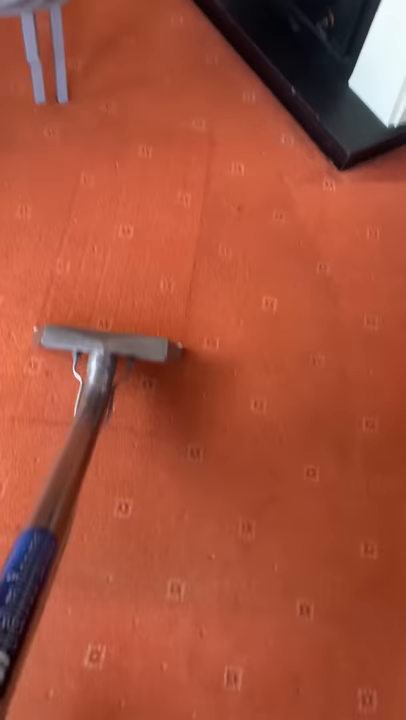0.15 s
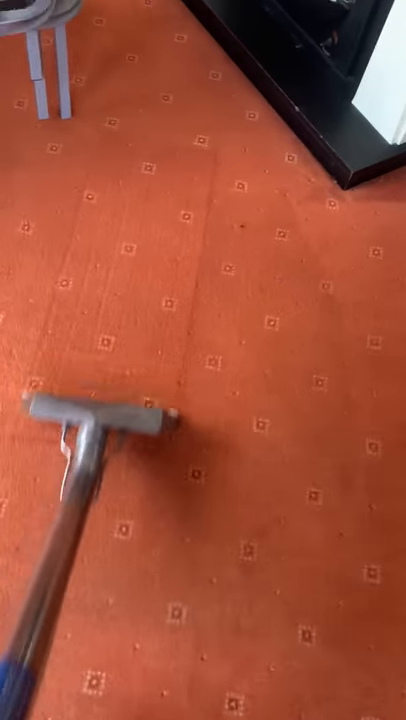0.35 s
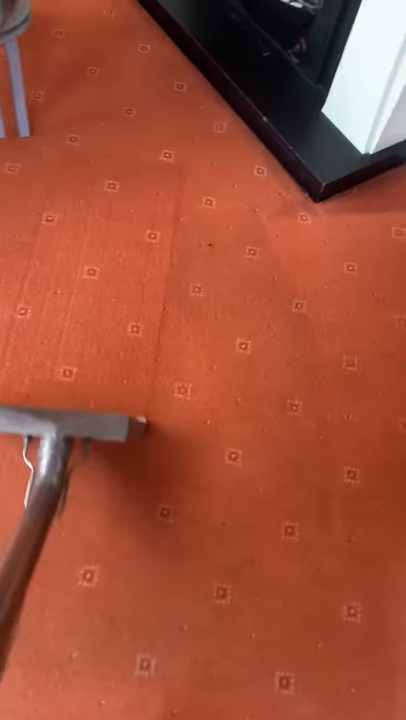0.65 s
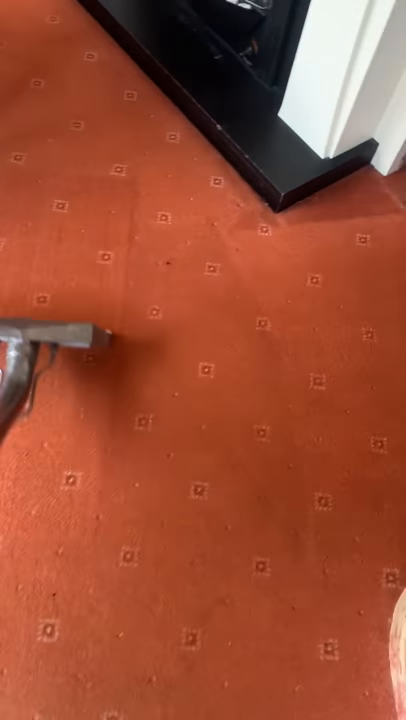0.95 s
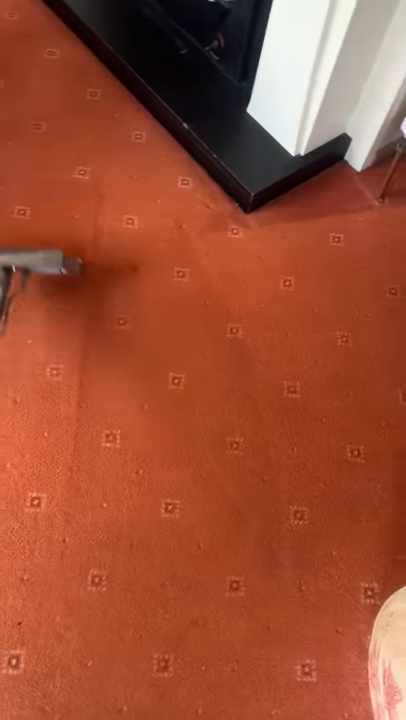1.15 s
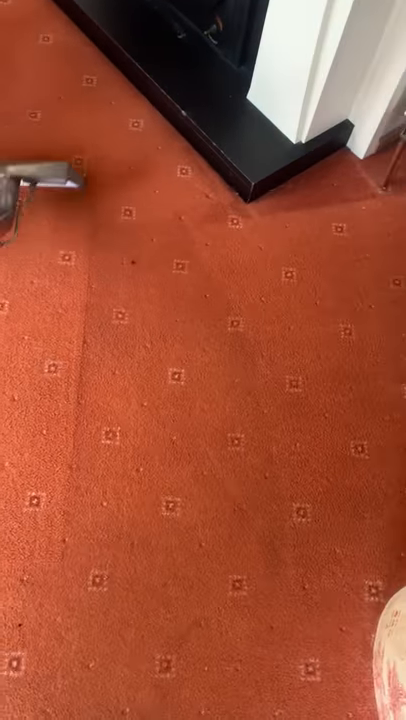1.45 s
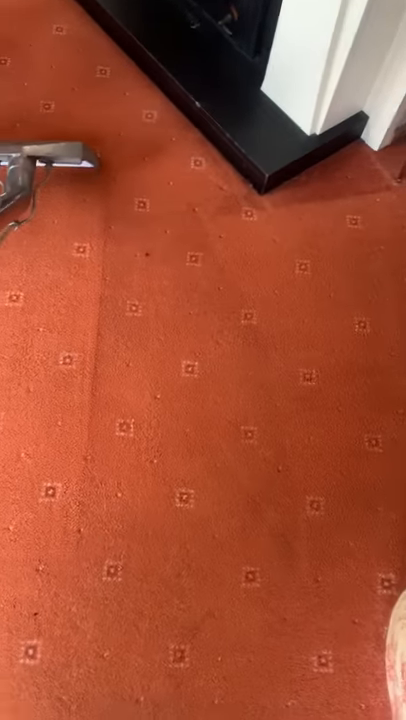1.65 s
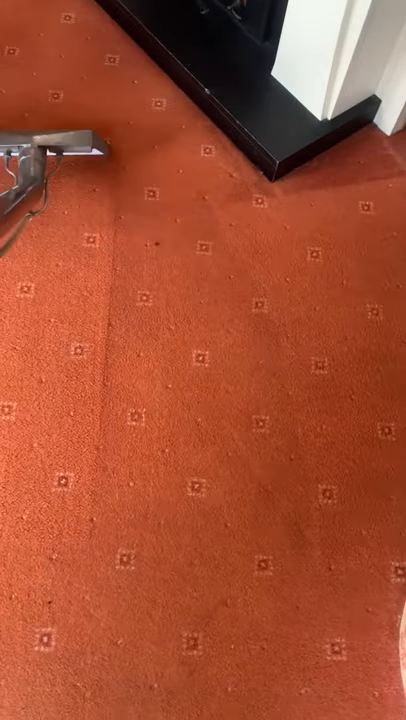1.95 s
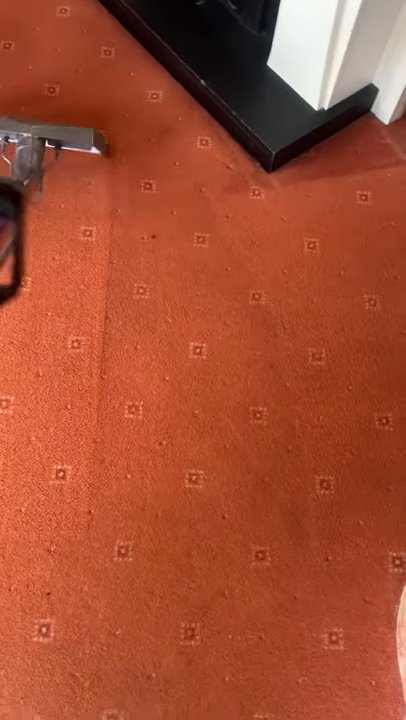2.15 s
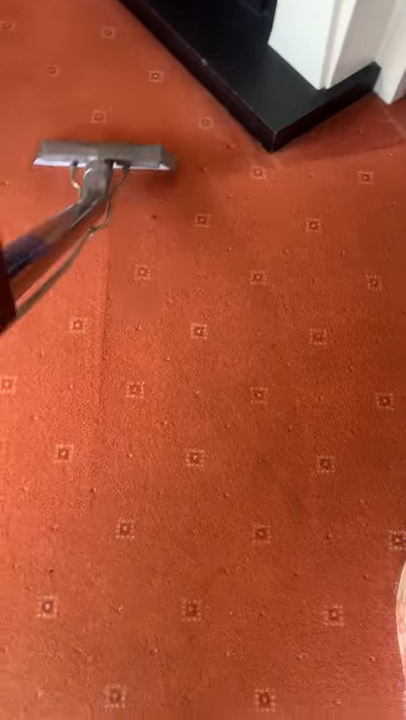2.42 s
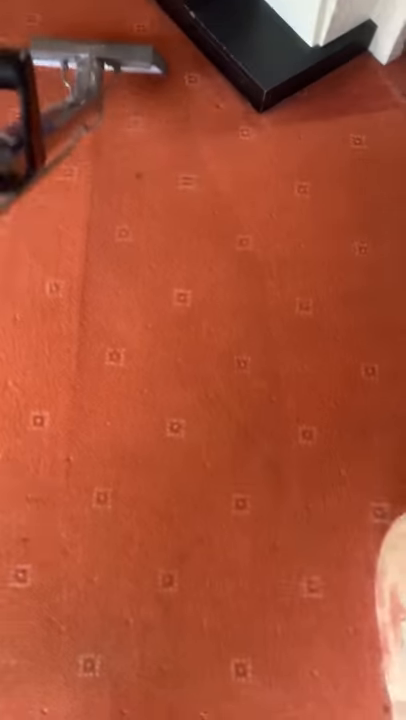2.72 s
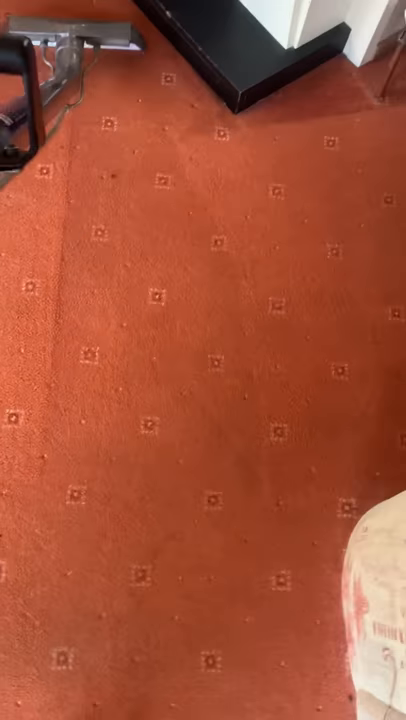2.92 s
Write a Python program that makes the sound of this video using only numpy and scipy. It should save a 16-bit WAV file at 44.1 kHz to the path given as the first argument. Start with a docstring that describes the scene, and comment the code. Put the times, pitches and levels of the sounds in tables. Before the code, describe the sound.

Wet vacuum suction of a carpet-cleaning wand over low machine hum, broken by one spluttering gulp

```python
"""Carpet-cleaning wand gulping air.

A wand is worked over a carpet in a living room. Shaped noise and drop impacts make the rush of air
and water into its slot, over a hum of sine tones and a lumpy rumble of low noise. Once the wand tilts
and its seal breaks: a short spluttering noise roar rings in the tube's resonances, and slugs of water
gurgle as rough gliding tones until the slot settles again.
"""
import sys
import numpy as np
from scipy import signal
from scipy.fft import rfft, irfft, next_fast_len
from scipy.io import wavfile
from scipy.ndimage import uniform_filter1d, map_coordinates

SR = 44100
rng = np.random.default_rng(int(sys.argv[2]) if len(sys.argv) > 2 else 0)


def to_wav(s):
    """Save 16-bit WAV."""
    ch = np.atleast_2d(s).T  # columns
    pcm = np.round(np.clip(ch, -1, 1) * 32767)  # PCM
    wavfile.write(sys.argv[1], SR, pcm.astype(np.int16))


N = 135828


def amp(db):
    """Decibels to gain."""
    return 10 ** (np.asarray(db) / 20)


def unit(x):
    """Each channel at rms 1."""
    return x / np.sqrt(np.mean(x ** 2, axis=-1, keepdims=True) + 1e-20)


def curve(rows):
    """(seconds, value) points as one value per sample."""
    return np.interp(np.arange(N) / SR, *np.transpose(rows))


def wobble(knots_per_s):
    """A smooth random curve around zero."""
    knots = rng.standard_normal(int(N * knots_per_s / SR) + 4)
    return map_coordinates(knots, [np.arange(N) * knots_per_s / SR])


def filtered(x, response):
    """x times a response of frequency."""
    size = next_fast_len(N + SR // 2)
    spectrum = rfft(x, size) * response(np.fft.rfftfreq(size, 1 / SR))
    return irfft(spectrum, size)[..., :N]


def coloured(x, points):
    """x shaped by (Hz, dB) points on a log frequency axis, at rms 1."""
    point_hz, db = np.transpose(points)
    return unit(filtered(x, lambda hz: amp(np.interp(np.log(hz + 1), np.log(point_hz + 1), db))))


def above(x, edge_hz, order):
    """High-pass."""
    return filtered(x, lambda hz: 1 - 1 / (1 + (hz / edge_hz) ** order))


def turbulence(patchy_db):
    """Two unrelated noises under the same time-frequency patches of random gain."""
    spectra = signal.stft(rng.standard_normal((2, N)), nperseg=1024)[2]
    field = rng.standard_normal(spectra.shape[1:])
    field = uniform_filter1d(field, size=4, axis=0)
    field = uniform_filter1d(field, size=3, axis=1)
    noise = signal.istft(spectra * amp(patchy_db * field / field.std()), nperseg=1024)[1]
    return unit(noise[:, :N])


def wet_flow(drops_per_s, spread_db, drop_share, patchy_db):
    """Turbulent air mixed, by share of power, with impacts of water drops of random size."""
    hits = rng.random(N) < drops_per_s / SR
    sizes = amp(spread_db * rng.standard_normal(N))
    drops = unit(hits * sizes * rng.choice([-1, 1], (2, N)))
    return np.sqrt(1 - drop_share) * turbulence(patchy_db) + np.sqrt(drop_share) * drops


# Hum of the machine. Each row: multiple of the shaft rate, mid level in dB, side relative to mid in dB.
HUM_LINES = [(1, -34, -56.5), (3, -42.5, -62), (4, -41.5, -60), (5, -47.5, -45.5), (6, -56, -55.5),
             (10, -56.5, -6.5), (15, -56, 2.5)]
# Build-up of the hum. Each row: time in seconds, gain in dB.
HUM_GAIN = [(.5, -3.5), (.85, 0), (2.6, 1.5)]
# Fading of the beating tone. Each row: time in seconds, level in dB.
BEAT_FADE = [(1.0, -46.5), (2.6, -55)]
SHAFT_HZ, SHAFT_DRIFT_RATIO, HUM_WAVER_DB = 42.74, 0.0049, 2.5
BEAT_HZ = 253.5  # beats against the hum


def machine():
    """Slightly unsteady multiples of the shaft rate that build up, and one unrelated tone that fades."""
    shaft_hz = SHAFT_HZ * (1 + SHAFT_DRIFT_RATIO * wobble(3))
    turn = 2 * np.pi * np.cumsum(shaft_hz) / SR
    out = np.zeros((2, N))
    for multiple, mid_db, side_re_mid_db in HUM_LINES:
        line = np.sqrt(2) * np.sin(multiple * turn + rng.uniform(0, 2 * np.pi, (2, 1)))
        gain = amp(curve(HUM_GAIN) + HUM_WAVER_DB * wobble(5.91))
        out += amp([[mid_db], [mid_db + side_re_mid_db]]) * gain * line
    beat = np.sqrt(2) * np.sin(2 * np.pi * BEAT_HZ * np.arange(N) / SR)
    out[0] += amp(curve(BEAT_FADE)) * beat
    return out


# Course of the rumble. Each row: time in seconds, level in dB.
RUMBLE_COURSE = [(0, -28), (.18, -25), (.27, -32), (.55, -29.5), (.78, -28.5), (1.33, -29.5), (1.54, -25.5),
                 (1.74, -30.5), (1.92, -33.5), (2.04, -26), (2.26, -27), (2.5, -31.5), (3.08, -31)]
# Spectrum of the rumble. Each row: frequency in Hz, relative density in dB per Hz.
RUMBLE_SPECTRUM = [(10, -32.5), (25, -8), (40, 0), (62, 0), (85, -6), (115, -9), (150, -17.5), (220, -27),
                   (320, -25), (600, -81)]
THROB_DB, THROB_KNOTS_PER_S = 2, 18


def rumble():
    """Low noise, levelled by its running power, then throbbing in uneven surges; mid only."""
    low = coloured(rng.standard_normal(N), RUMBLE_SPECTRUM)
    power = np.abs(uniform_filter1d(low ** 2, size=5000))
    steady = low / np.sqrt(power + 1e-6)
    level = amp(curve(RUMBLE_COURSE) + THROB_DB * wobble(THROB_KNOTS_PER_S))
    return np.array([level * steady, np.zeros(N)])


# Spectra of the rush, mid and side. Each row: frequency in Hz, relative density in dB per Hz.
AIR_MID_SPECTRUM = [(40, -8.5), (110, 9), (190, 2.5), (290, -1.5), (400, -1.5), (480, -7.5), (530, -9.5),
                    (590, 0.4), (690, 1.5), (760, 6.5), (850, -2.5), (960, 2), (1040, -7.5), (1130, 0),
                    (1350, 4.5), (1800, -2.5), (2080, 1.16), (2350, -3), (2650, -10.5), (3050, -15),
                    (3750, -13), (4300, -18), (5200, -29.5), (6400, -42.5), (7800, -50.5), (8800, -68.5),
                    (13000, -63.5)]
AIR_SIDE_SPECTRUM = [(250, -1.5), (450, 4), (510, 7), (570, 12.5), (610, 4), (690, 11), (755, 12),
                     (860, 8.5), (950, 12.5), (1020, 2.5), (1120, 8.5), (1350, 6), (1780, -3.5),
                     (2250, -1.5), (3000, -6.5), (3650, -9.5), (4150, -16.5), (4800, -19.5), (5700, -30),
                     (6500, -43.5), (8500, -52.5), (13000, -69)]
# Hiss at the slot. Each row: time in seconds, treble gain in dB.
HISS_GAIN = [(0, 5.5), (.1, 4), (.25, 3), (1.2, -0.2), (1.9, -0.5), (2.4, 2), (2.56, -1.5), (2.9, 1),
             (3.08, -1)]
# Throaty band of the rush. Each row: time in seconds, band gain in dB.
THROAT_GAIN = [(0, 1), (1.7, 0), (2.3, -0.5), (2.6, -3.5), (3.08, 1)]
AIR_MID_DB, AIR_SIDE_DB, AIR_PATCHY_DB, AIR_WAVER_DB = -35, -30.5, 3, 0.6
DROPS_PER_S, DROP_SPREAD_DB, DROP_SHARE = 900, 3.5, 0.16
HISS_FROM_HZ = 3400
THROAT_HZ, THROAT_WIDTH_HZ, THROAT_WAVER_DB = 1430, 330, 1.1


def suction():
    """Wet air rushes through the slot; its throaty band and its hiss change as the wand travels."""
    mid, side = wet_flow(DROPS_PER_S, DROP_SPREAD_DB, DROP_SHARE, AIR_PATCHY_DB)
    mid = amp(AIR_MID_DB) * coloured(mid, AIR_MID_SPECTRUM)
    side = amp(AIR_SIDE_DB) * coloured(side, AIR_SIDE_SPECTRUM)
    air = np.array([mid, side])
    hiss = above(air, HISS_FROM_HZ, order=6)
    hiss_gain = amp(curve(HISS_GAIN))
    throat = filtered(air, lambda hz: np.exp(-((hz - THROAT_HZ) / THROAT_WIDTH_HZ) ** 2))
    throat_gain = amp(curve(THROAT_GAIN) + THROAT_WAVER_DB * wobble(40))
    rush = air + (hiss_gain - 1) * hiss + (throat_gain - 1) * throat
    return rush * amp(AIR_WAVER_DB * wobble(17))


ROOM_T60_S, ROOM_DB = 0.14, -6.5


def room(x):
    """The short tail of a carpeted room, as decaying noise, colours x with fine peaks and dips."""
    t = np.arange(SR // 2) / SR
    tail = rng.standard_normal((2, len(t))) * np.exp(-np.log(1000) * t / ROOM_T60_S)
    tail /= np.linalg.norm(tail, axis=1, keepdims=True)
    wet = signal.fftconvolve(x, tail, axes=1)[:, :N]
    return (x + amp(ROOM_DB) * wet) / np.sqrt(1 + amp(ROOM_DB) ** 2)


# Soft low bumps in the rumble. Each row: centre in seconds, peak in dB.
BUMP_PEAKS = [(0.044, -16.5), (0.114, -18.5), (0.183, -19.5), (.558, -20), (0.685, -19.5), (1.189, -20),
              (1.279, -17), (1.422, -14), (1.497, -13), (1.543, -12), (1.616, -15.5), (1.671, -15),
              (1.785, -17), (2.26, -17.5), (2.823, -17.5), (2.923, -17)]
BUMP_HZ, BUMP_WIDTH_S, BUMP_PITCH_SPREAD = 58, 0.012, 0.17  # spread in log frequency


def bumps():
    """Dull bumps: Gaussian bursts of a cycle or two at scattered low pitches; mid only."""
    t = np.arange(N) / SR
    out = np.zeros(N)
    for centre_s, peak_db in BUMP_PEAKS:
        pitch, phase = rng.standard_normal(2)
        hz = BUMP_HZ * np.exp(BUMP_PITCH_SPREAD * pitch)
        swell = np.exp(-((t - centre_s) / BUMP_WIDTH_S) ** 2)
        out += amp(peak_db) * swell * np.cos(2 * np.pi * (hz * (t - centre_s) + phase))
    return np.array([out, np.zeros(N)])


# Air flow of the gulp. Each row: time in seconds, flow level in dB.
GULP_COURSE = [(2.0, -50.5), (2.08, -18), (2.118, -5.5), (2.175, -5), (2.205, -3.5), (2.24, -6),
               (2.335, -5.5), (2.38, -6.5), (2.41, -13.5), (2.56, -48.5)]
# Spectra of the roar, mid and side. Each row: frequency in Hz, relative density in dB per Hz.
GULP_MID_SPECTRUM = [(80, -32), (180, -13.5), (300, -3), (400, 0), (520, -6.5), (620, 2.5), (850, -5),
                     (1000, -18), (1200, -13), (1700, -17), (2150, -11), (2450, -16.5), (2900, -21.5),
                     (3800, -23), (5000, -37.5), (6500, -54.5), (9000, -110)]
GULP_SIDE_SPECTRUM = [(300, -11.5), (460, -1), (650, 0.5), (900, -4), (1200, -6.5), (1450, -17.5),
                      (1800, -22), (2100, -17.5), (2750, -17.5), (3400, -23), (4300, -31.5), (5500, -45.5),
                      (6800, -64.5), (9000, -110)]
GULP_DB, GULP_SIDE_RE_MID_DB = -26, 7
SPLUTTER_PER_S, SPLUTTER_SPREAD_DB, SPLUTTER_SHARE = 260, 2.5, 0.27
INRUSH_S, CLOSE_S = 2.135, 2.39
GULP_TREBLE_HZ, GULP_BRIGHT_DB, GULP_DULL_DB = 2410, 5, -3  # treble gain at inrush and at close


def gulp():
    """The seal breaks: air and water splutter in, bright at first and duller as the slot settles."""
    mid, side = wet_flow(SPLUTTER_PER_S, SPLUTTER_SPREAD_DB, SPLUTTER_SHARE, patchy_db=0.5)
    mid = coloured(mid, GULP_MID_SPECTRUM)
    side = amp(GULP_SIDE_RE_MID_DB) * coloured(side, GULP_SIDE_SPECTRUM)
    roar = np.array([mid, side])
    treble = above(roar, GULP_TREBLE_HZ, order=6)
    treble_gain = amp(curve([(INRUSH_S, GULP_BRIGHT_DB), (CLOSE_S, GULP_DULL_DB)]))
    return amp(GULP_DB + curve(GULP_COURSE)) * (roar + (treble_gain - 1) * treble)


# Resonances of the open tube. Each row: centre in Hz, width in Hz, relative mid gain in dB,
# relative side gain in dB.
TUBE_MODES = [(622, 78, -3, -2.5), (876, 12, 1, 3.5), (1178, 32, 0, 0.5), (1657, 59, -9, -21),
              (1982, 25, -5.5, -12), (2300, 230, -13, -19)]
TUBE_ATTACK_S, TUBE_T60_S, TUBE_DB, TUBE_SIDE_RE_MID_DB = 0.045, 0.36, -24, 5.5


def tube():
    """The first inrush, as noise, blows the resonances of the tube, then dies away."""
    def resonances(hz):
        total = 0
        for k, (centre_hz, width_hz, mid_db, side_db) in enumerate(TUBE_MODES):
            damping = 1j * hz * width_hz
            mode = damping / (centre_hz ** 2 - hz ** 2 + damping)
            total = total + (-1) ** k * amp([[mid_db], [side_db]]) * mode  # alternating polarity
        return total

    ring = filtered(rng.standard_normal((2, N)), resonances)
    ring = unit(ring - above(ring, edge_hz=3300, order=10))  # low-pass
    t = np.arange(N) / SR - INRUSH_S
    attack = np.clip(1 + t / TUBE_ATTACK_S, 0, 1)
    decay = np.exp(-np.log(1000) * np.maximum(t, 0) / TUBE_T60_S)
    return amp([[TUBE_DB], [TUBE_DB + TUBE_SIDE_RE_MID_DB]]) * attack * decay * ring


# Slugs of water in the slot, deepest as it closes. Each row: centre in seconds, pitch in Hz,
# mid peak in dB, side peak in dB.
WATER_SLUGS = [(2.151, 458, -29, -19.5), (2.175, 513, -32.5, -19), (2.207, 559, -29.5, -22),
               (2.262, 770, -33, -26), (2.275, 289.4, -29.5, -42), (2.317, 587, -31.5, -26),
               (2.357, 307.8, -29, -40), (2.366, 632, -28.5, -25), (2.381, 838, -35.5, -25),
               (2.398, 165, -24.5, -38), (2.401, 291, -30.5, -41)]
SLUG_WIDTH_S, SLUG_RISE, SLUG_ROUGH = 0.013, 0.03, 0.07  # rise per width, roughness: log frequency


def gurgle():
    """Each slug of water rings an air pocket: a short rough tone that swells, bends upward and dies."""
    t = np.arange(N) / SR
    out = np.zeros((2, N))
    for centre_s, hz, mid_db, side_db in WATER_SLUGS:
        age = np.clip((t - centre_s) / SLUG_WIDTH_S, -4, 4)  # in widths
        pitch_hz = hz * np.exp(SLUG_RISE * age + SLUG_ROUGH * wobble(300))
        turn = 2 * np.pi * (np.cumsum(pitch_hz) / SR + rng.random())
        tones = np.array([np.cos(turn), np.sin(turn)])
        out += amp([[mid_db], [side_db]]) * np.exp(-age ** 2) * tones
    return out


def scene():
    """All sources, from mid and side to left and right."""
    mid, side = machine() + rumble() + room(suction()) + bumps() + gulp() + tube() + gurgle()
    return np.array([mid + side, mid - side])


# Left-right lean of the treble. Each row: frequency in Hz, left minus right in dB.
TREBLE_LEAN = [(400, 0), (2000, -1), (2800, -1), (4200, 4), (6500, -0.5)]
SIDE_FROM_HZ, TOP_HZ = 373, 15300


def record(dry):
    """The microphone pair folds the bass to mono, tilts the treble between the sides and cuts the top."""
    dry = dry * signal.windows.tukey(N, .003)  # brief fades at both ends
    mid = (dry[0] + dry[1]) / 2
    side = above((dry[0] - dry[1]) / 2, SIDE_FROM_HZ, order=12)

    def response(hz):
        lean_db = np.interp(hz, *np.transpose(TREBLE_LEAN))
        return amp(np.array([[.5], [-.5]]) * lean_db) * (hz < TOP_HZ)

    return filtered(np.array([mid + side, mid - side]), response)


dry = scene()
out = record(dry)
to_wav(out)
```